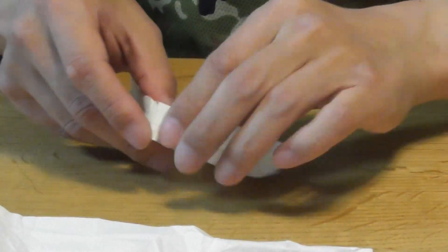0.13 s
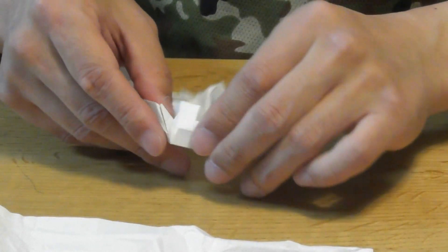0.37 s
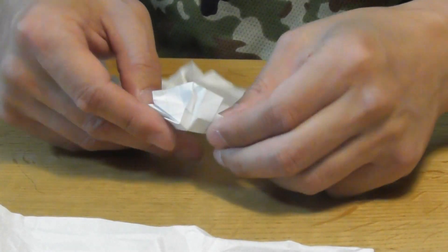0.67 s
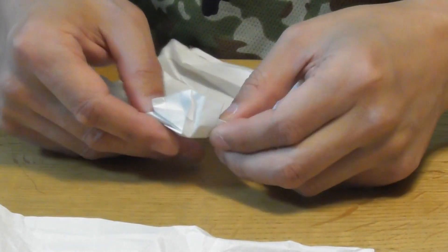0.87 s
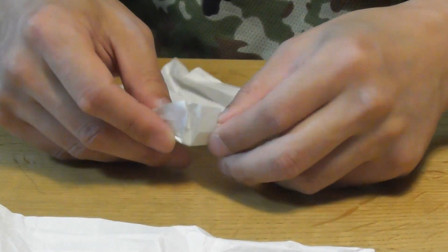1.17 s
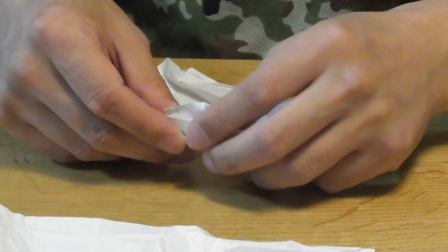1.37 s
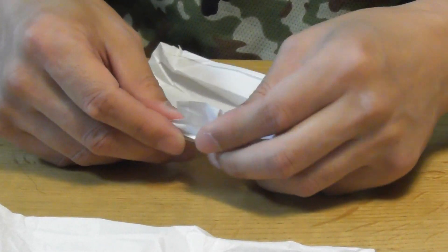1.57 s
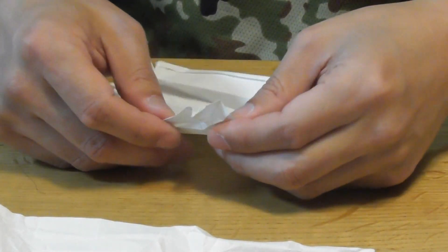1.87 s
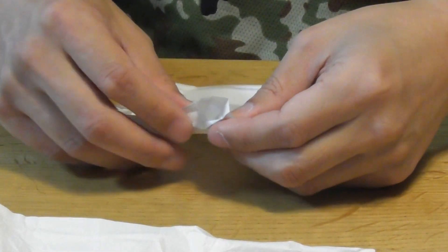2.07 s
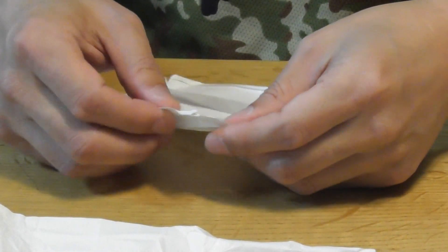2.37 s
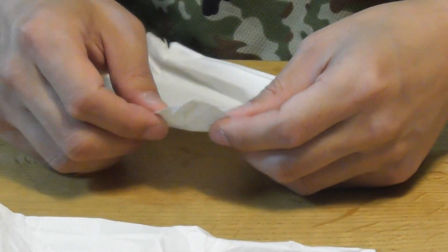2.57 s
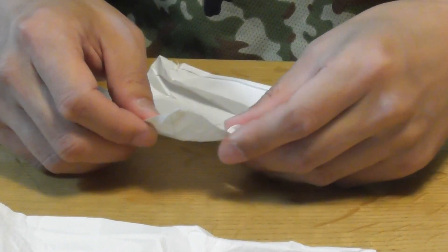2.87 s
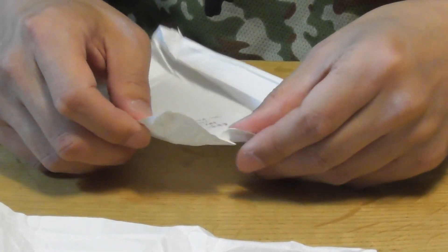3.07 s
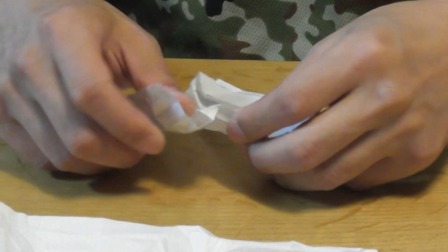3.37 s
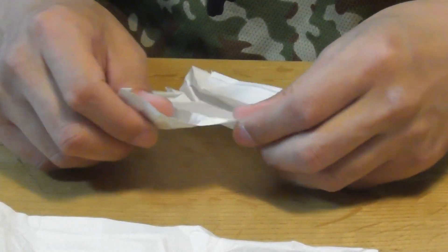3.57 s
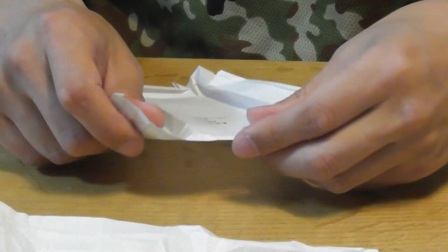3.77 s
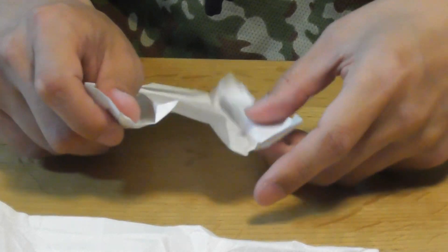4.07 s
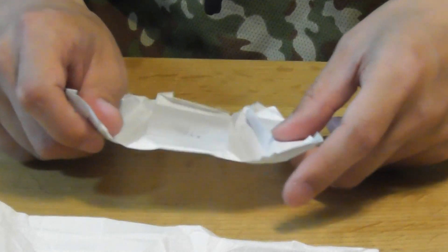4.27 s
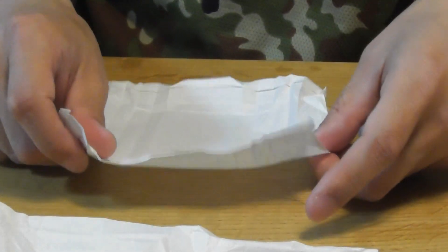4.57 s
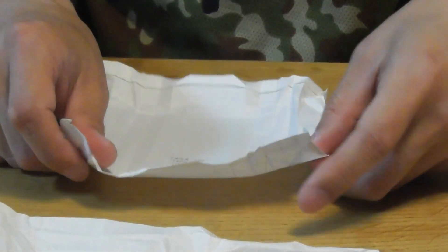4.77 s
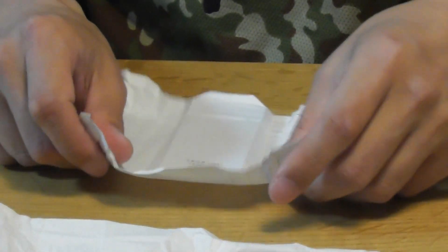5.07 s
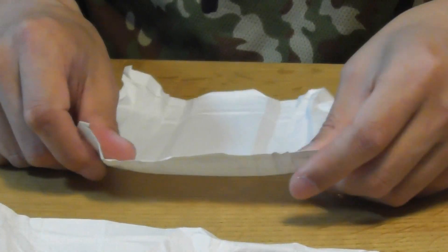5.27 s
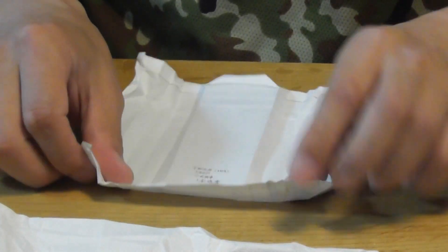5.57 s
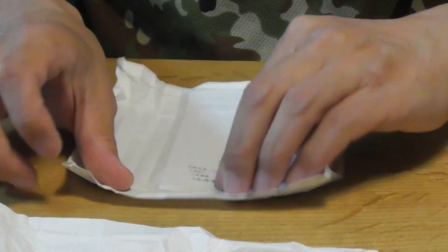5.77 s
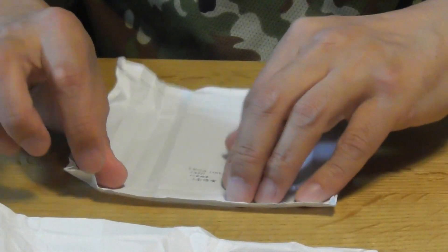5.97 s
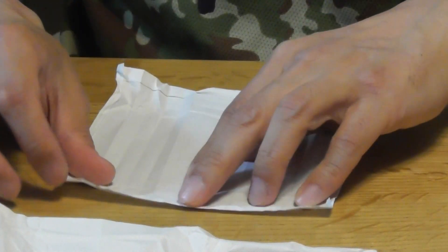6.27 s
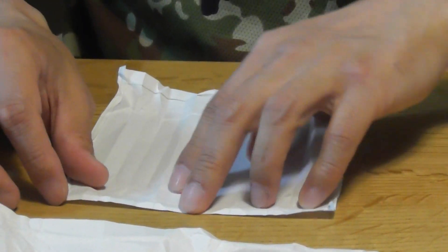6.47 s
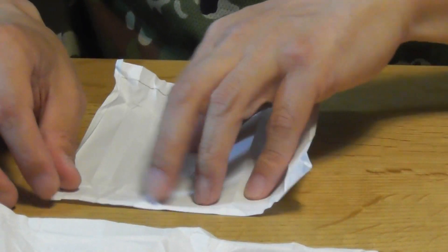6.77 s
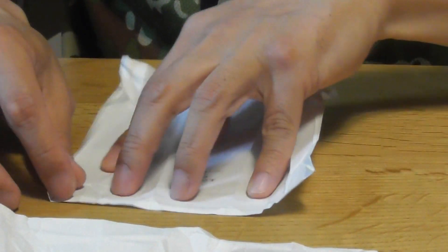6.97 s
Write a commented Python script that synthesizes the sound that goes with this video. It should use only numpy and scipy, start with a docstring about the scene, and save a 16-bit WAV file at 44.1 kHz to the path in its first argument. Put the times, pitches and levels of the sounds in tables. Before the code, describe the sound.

Hands unfold a small paper model over a wooden table, heard up close in a quiet room. From the start, creases give short, bright, irregular crinkles, mixed with dull little pops of flipping panels and the soft rustle of fingers. A sharp snap stands out at 1.5 seconds, and scattered crackles follow from about 2.2 to 3.6 seconds. The loudest, busiest cracks come between 4.1 and 4.9 seconds as the sheet opens. Another cluster runs from about 5.1 to 5.9 seconds, then fingers slide and flatten the paper, with one more crisp snap near 6.7 seconds and lighter crinkles until about 7 seconds. Wrists occasionally bump the table softly, most clearly around 2.7, 3.4 and 3.9 seconds. Underneath are faint steady hiss, a slight low rumble and very faint rapid mechanical ticking. The sound is slightly hollow, with a short echo.

```python
"""Hands unfold a small folded paper model over a wooden table in a quiet room.
Creases snap in quick runs of clicks, panels flip with a dull pop, and the sheet rustles as fingers
slide on it. Wrists bump the table. Behind this are a short echo, steady background noise, a low rumble
and a faintly ticking camera. A hollow microphone colour favours pitches near 500 Hz and 8 kHz."""
import sys
import numpy as np
from scipy import signal
from scipy.fft import rfft, irfft
from scipy.io import wavfile
from scipy.ndimage import uniform_filter1d

SR = 44100
rng = np.random.default_rng(int(sys.argv[2]) if len(sys.argv) > 2 else 0)


def materialize(psi):
    """Save the field psi as 16-bit PCM at rate SR to the path in sys.argv[1].

    A 1-D psi becomes a single channel; in a 2-D psi each row is a channel.
    """
    bounded = np.clip(np.atleast_2d(psi).T, -1, 1)
    quanta = np.round(bounded * 32767).astype(np.int16)
    wavfile.write(sys.argv[1], SR, quanta)


N = 314874


def amp(db):
    """Turn decibels into a gain."""
    return 10 ** (np.asarray(db) / 20)


def unit_level(x):
    """Scale a sound to an average power of 1."""
    return x / np.sqrt(np.mean(x ** 2) + 1e-20)


def curve_at(points, hz):
    """Read between the rows of a table of pitches and values."""
    pitches, values = np.transpose(points)
    return np.interp(np.log(hz + 1), np.log(pitches + 1), values)


def add(mix, start_s, sound):
    """Mix a sound in at its start time."""
    part = mix[max(round(start_s * SR), 0):][:len(sound)]
    part += sound[:len(part)]


def noise(shape_db, count):
    """Make rows of steady noise with the given level at each pitch."""
    return irfft(rfft(rng.standard_normal((count, N))) * amp(shape_db), N)


# The tone of paper as the microphone hears it. Each row: pitch in Hz, level in dB.
PAPER_TONE = [(120, -37.5), (200, -6), (316, -6.5), (465, -2), (1000, -8.5), (1470, -22), (2470, -29),
              (3490, -22), (4950, -29.5), (5840, -18), (8580, -4), (11000, -12.5), (15100, -25),
              (16000, -32)]

def band_ring(low_hz, high_hz, peak_hz=1000, lift_db=0., spread=.1):
    """The short ring a click leaves in one band of the paper's tone, lifted around peak_hz."""
    hz = np.fft.rfftfreq(2048, 1 / SR) + 1
    edges_db = -10 * np.log10((1 + (low_hz / hz) ** 12) * (1 + (hz / high_hz) ** 12))
    peak_db = lift_db * np.exp(-(np.log(hz / peak_hz) / spread) ** 2)
    gains = amp(np.maximum(curve_at(PAPER_TONE, hz) + edges_db + peak_db, -100))
    cepstrum = irfft(np.log(gains))
    cepstrum[1:1024] *= 2  # folding onto the first half makes the ring start at once
    cepstrum[1025:] = 0
    return irfft(np.exp(rfft(cepstrum)))


# The tone of the background noise. Each row: pitch in Hz, relative level in dB.
NOISE_TONE = [(20, -4), (127, 2), (177, 1), (513, -0.5), (1200, -16.5), (1760, -23), (2460, -37),
              (3340, -24), (5080, -32.5), (7950, -13), (10800, -30.5), (14700, -22.5), (16000, -33.5)]
# Stereo width of the background noise: almost mono from 2 to 8 kHz, with wide microphone hiss above.
# Each row: pitch in Hz, side level over mid level in dB.
NOISE_STEREO = [(30, -2.5), (200, -3.5), (1300, -7), (1900, -10.5), (2600, -63), (7800, -31), (9000, -4),
                (10500, 2.5), (15000, -2.5)]
# A wavering low hum. Each row: pitch in Hz, width in Hz, level in dB.
HUM_BANDS = [(132.97, 1.7, -67)]

def background_noise(level_db=-58):
    """Room air, microphone hiss and hum, as mid (what both ears share) and side (how they differ)."""
    hz = np.fft.rfftfreq(N, 1 / SR)
    mid_db = curve_at(NOISE_TONE, hz)
    mid_side = noise(np.array([mid_db, mid_db + curve_at(NOISE_STEREO, hz)]), count=2)
    mid_side *= amp(level_db) / mid_side[0].std()
    for hum_hz, width_hz, db in HUM_BANDS:
        hum_shape_db = -20 * np.log10(1 + (2 * (hz - hum_hz) / width_hz) ** 2)
        mid_side[0] += amp(db) * unit_level(noise(hum_shape_db, count=1)[0])
    return mid_side


# How the rumble swells and sinks. Each row: time in seconds, level in dB.
RUMBLE_LEVELS = [(0, -82), (2.3, -91), (2.8, -71), (3.3, -64), (3.9, -77), (4.6, -87), (5.3, -72),
                 (5.7, -82), (7.14, -63)]

def rumble(cutoff_hz=90):
    """Deep noise as mid and side, with the side 5 dB weaker."""
    hz = np.fft.rfftfreq(N, 1 / SR)
    deep = noise(-20 * np.log10(1 + (hz / cutoff_hz) ** 3), count=2)
    level_db = np.interp(np.arange(N) / SR, *np.transpose(RUMBLE_LEVELS))
    return amp(level_db) * unit_level(deep) * amp([[0], [-5]])


# How long the room rings. Each row: pitch in Hz, seconds to fade by 60 dB.
ECHO_TIMES = [(300, 0.31), (1000, 0.13), (3000, 0.34), (8000, 0.12), (14000, 0.016)]
# Stereo width given to the echo, narrowed almost to mono from 2 to 8 kHz.
# Each row: pitch in Hz, side level over mid level in dB.
ECHO_STEREO = [(200, -18.5), (1300, 0), (2200, -21.5), (7000, -45), (9000, -6.5), (11000, 9.5), (15000, 4)]

def room_echo(sound):
    """Sparse reflections, as mid and side, in which each pitch dies at its own speed."""
    reflections = np.zeros((3, 2, SR // 2))
    delays = np.arange(80, SR // 2 - 20, 20) + rng.integers(0, 20, (3, 2, (SR // 2 - 81) // 20))
    np.put_along_axis(reflections, delays, rng.choice([-1., 1.], delays.shape), 2)
    hz, t, spectra = signal.stft(reflections, SR, nperseg=256)
    fade_s = np.maximum(curve_at(ECHO_TIMES, hz), .03)
    spectra *= amp(-60 * t / fade_s[:, None])
    spectra[:, 1] *= amp(curve_at(ECHO_STEREO, hz))[:, None]
    tails = signal.istft(spectra, SR, nperseg=256)[1]
    # Three echoes take turns, so the tail stays smooth and no single pitch rings out.
    turns = np.sqrt(2 / 3) * np.cos(np.pi * (np.arange(N) / SR * 3 + np.arange(3)[:, None] / 3))
    return sum(signal.fftconvolve((sound * turn)[None], tail / np.linalg.norm(tail[0]), axes=1)[:, :N]
               for turn, tail in zip(turns, tails))


def camera_ticks(steps_per_s=59.94, level_db=-65.5, buzz_ms=3.5):
    """A drive in the camera steps evenly; each step is a short swelling buzz that rings the body."""
    step = np.arange(int(N / SR * steps_per_s))
    start_s = .0005 + step / steps_per_s
    step_db = level_db - 3 * (1 - step % 2)  # every other step is weaker
    step_db += 2.5 * rng.standard_normal(len(step))
    easing_off = ((start_s > .92) & (start_s < 1.36)) | ((start_s > 1.9) & (start_s < 2.15))
    kicks = np.zeros(N)
    kicks[np.round(start_s * SR).astype(int)] = amp(step_db - 10 * easing_off)
    swell = np.linspace(.5, 1, round(buzz_ms * SR / 1000))
    buzz = np.convolve(kicks, swell)[:N] * rng.standard_normal(N)
    body = band_ring(MIDDLE_HZ, HIGH_HZ, peak_hz=3046, lift_db=10.8, spread=0.061)
    treble = band_ring(HIGH_HZ, TOP_HZ, peak_hz=7460, lift_db=18.0, spread=0.061)
    ring = body / np.linalg.norm(body) + amp(3) * treble / np.linalg.norm(treble)
    return signal.oaconvolve(buzz, ring)[:N]


# Wrists and knuckles on the table. Each row: start in seconds, level in dB, pitch in Hz.
TABLE_BUMPS = [(1.854, -47, 120), (2.469, -53, 167), (2.73, -42, 96), (3.164, -63, 142),
               (3.353, -39.5, 129), (3.875, -44.5, 99), (5.172, -56, 129), (5.842, -49.5, 185)]

def table_bumps(rise_s=0.0059):
    """Soft low thuds travel through the table top, each a few cycles long."""
    out, t = np.zeros(N), np.arange(6000) / SR
    envelope = t / rise_s * np.exp(1 - t / rise_s)
    for start_s, db, hz in TABLE_BUMPS:
        add(out, start_s, amp(db) * envelope * np.sin(2 * np.pi * hz * t))
    return out


def swells(t, peak_s, db, rise_s, fade_s):
    """The summed power of swells that rise and fade by 20 dB in the given times, 3 ms at least."""
    since_s = t[:, None] - peak_s
    slope_s = np.maximum(np.where(since_s < 0, rise_s, fade_s), .003)
    return (amp(db - 20 * abs(since_s) / slope_s) ** 2).sum(axis=1)


def settling(t, events, after_db, growth, fade_s):
    """The power of paper settling: after_db follows an event of -30 dB, more follows a stronger one."""
    start_s, event_db = np.transpose(events)[:2]
    strength_db = np.minimum(event_db, -23) + 30  # the very strongest settle no louder
    return swells(t, start_s, after_db + growth * strength_db, .01, fade_s)


# Fingers sliding or pulling on the paper. Each row: time of the peak in seconds, hiss level in dB,
# flutter level in dB, rise in seconds, fade in seconds.
FINGER_STROKES = [(0.0, -56, -58.5, .1, 0.8), (0.335, -51.5, -79, 0.037, 0.1),
                  (0.429, -46, -58.5, .2, 0.07), (0.921, -49, -58.5, 0.035, 0.06),
                  (1.042, -50, -51, 0.026, -1.12), (1.147, -57, -75, 0.19, 0.1),
                  (1.233, -59.5, -85, 0.039, 1), (1.32, -57.5, -56, 0.075, -0.16),
                  (1.52, -60, -62.5, 0.057, 1.5), (1.7, -65.5, -64, 0.13, 0.46),
                  (1.989, -52, -76, 0.06, 0.17), (2.275, -49, -56, 0.052, -0.28),
                  (2.42, -58, -60, 0.058, .15), (2.62, -57, -72, 0.31, 0.5), (2.8, -59.5, -59.5, 0.34, 0.6),
                  (3.08, -59, -61.5, .1, 0.6), (3.348, -44, -47, 0.067, 0.33),
                  (3.399, -66, -41.5, 0.11, 0.3), (3.732, -49, -72, 0.15, 0.06),
                  (3.85, -50.5, -59, 0.13, 0.07), (3.925, -45.5, -53, 0.053, 0.09),
                  (4.107, -52, -56.5, 0.16, 0.56), (4.98, -58.5, -60, 0.51, 1), (5.166, -54, -53, 0.13, .3),
                  (5.312, -53, -56, 0.044, 0.1), (5.455, -50.5, -56, 0.061, 0),
                  (5.565, -47.5, -52, 0.079, 0.16), (5.795, -46.5, -50.5, 0.23, 0.21),
                  (5.87, -49.5, -56.5, 0.059, 0.56), (6.112, -69, -56.5, 0.28, 0.2),
                  (6.411, -58.5, -77, 0.036, 2), (6.547, -51.5, -60.5, 0.013, 0.2),
                  (6.69, -51, -61, 0.13, 0), (6.82, -56, -58, 0.27, .1), (7.094, -46.5, -60, 0.17, 1.5)]

def handling_levels(held_hiss_db=-76.5, held_flutter_db=-66.5):
    """Hiss and flutter in dB: fingers hold and stroke, snapped creases hiss on, popped panels flutter."""
    t = np.arange(0, N, 64) / SR
    peak_s, hiss_db, flutter_db, rise_s, fade_s = np.transpose(FINGER_STROKES)
    hiss = amp(held_hiss_db) ** 2 + swells(t, peak_s, hiss_db, rise_s, fade_s)
    hiss += settling(t, CREASE_SNAPS, after_db=-55.5, growth=1, fade_s=0.085)
    flutter = amp(held_flutter_db) ** 2 + swells(t, peak_s, flutter_db, rise_s, fade_s)
    flutter += settling(t, PANEL_POPS, after_db=-48.5, growth=0.94, fade_s=0.11)
    return [np.interp(np.arange(N) / SR, t, 10 * np.log10(power)) for power in (hiss, flutter)]


MIDDLE_HZ, HIGH_HZ, TOP_HZ = 1470, 5000, 10500  # where the three upper bands begin

def rustle(clicks_per_s=1500):
    """Skin sliding on paper makes a hiss with clumps of tiny clicks; the sheet answers in four bands."""
    hiss_db, flutter_db = handling_levels()
    clumps = unit_level(uniform_filter1d(rng.standard_normal(N), 300))
    grip = unit_level(uniform_filter1d(rng.standard_normal(N), 1000))  # the skin grips and slips
    sizes = amp(5.0 * np.minimum(rng.exponential(1, N), 4) + 5.5 * clumps + 4.1 * grip)
    clicks = sizes * rng.choice([-1., 1.], N) * (rng.random(N) < clicks_per_s / SR)
    slide = amp(1.6 * clumps + 1.6 * grip) * rng.standard_normal(N)
    band_clicks = clicks * amp(2.4 * rng.standard_normal((4, N)))  # every click favours some bands
    frictions = unit_level(slide) + amp(-8.5) * unit_level(band_clicks)
    fullness_db = flutter_db - hiss_db  # still paper sounds bright, a fluttering sheet fuller
    bands = [(hiss_db - 7.0 - 0.12 * fullness_db, band_ring(TOP_HZ, SR)),
             (hiss_db, band_ring(HIGH_HZ, TOP_HZ)),
             (hiss_db - 14.0 + 0.4 * fullness_db, band_ring(MIDDLE_HZ, HIGH_HZ)),
             (flutter_db, band_ring(170, MIDDLE_HZ, peak_hz=455, lift_db=5.0, spread=1.0))]
    return sum(amp(db) * unit_level(signal.oaconvolve(friction, ring)[:N])
               for (db, ring), friction in zip(bands, frictions))


LEAD = 300  # samples of faint crackle before the paper gives way

def click_runs(count):
    """One run of uneven clicks for each event, with a strong click where the paper gives way."""
    draws = rng.standard_normal((count, 2, 1800))
    runs = draws[:, 0] * amp(2.2 * draws[:, 1])
    runs[:, LEAD] = 5.1
    return runs


def ring_out(clicks, decay_ms, ring):
    """Clicks build faintly, break and die away, setting off a ring; the result peaks at 1."""
    t_ms = (np.arange(len(clicks)) - LEAD) / SR * 1000
    build = amp(-30.0 + 18.0 * t_ms) + amp(39.0 * t_ms)
    decay = np.exp(-abs(t_ms) / max(decay_ms, .05))
    sound = signal.fftconvolve(clicks * np.where(t_ms < 0, build, decay), ring)
    return sound / abs(sound).max()


# Panels of paper flipping over. Each row: start in seconds, level in dB, pitch in Hz.
PANEL_POPS = [(0.13, -36, 532), (0.256, -32, 408), (0.567, -46, 517), (0.772, -39.5, 640),
              (0.992, -42.5, 1260), (1.055, -43, 617), (1.316, -39.5, 480), (1.45, -39, 570),
              (1.505, -37, 577), (1.664, -43.5, 550), (1.791, -45.5, 580), (2.113, -42.5, 570),
              (2.168, -41, 534), (2.198, -43, 570), (2.269, -40.5, 533), (2.283, -28.5, 553),
              (2.453, -41, 583), (2.581, -35, 430), (2.7, -37.5, 667), (2.731, -38, 554),
              (2.995, -42.5, 620), (3.031, -42.5, 1090), (3.283, -42, 480), (3.333, -31, 396),
              (3.392, -33, 454), (3.532, -33, 560), (3.6, -29.5, 553), (3.912, -43, 515),
              (3.924, -39.5, 800), (4.012, -40, 490), (4.098, -38.5, 1100), (4.195, -39, 630),
              (4.319, -36.5, 616), (4.337, -30.5, 410), (4.581, -40.5, 440), (4.602, -31.5, 590),
              (5.119, -46, 496), (5.181, -39, 443), (5.29, -43, 427), (5.317, -40.5, 710),
              (5.552, -37, 560), (5.571, -36, 550), (5.781, -36, 426), (5.852, -57, 593),
              (5.914, -32.5, 640), (6.107, -39.5, 576), (6.645, -46, 497), (6.655, -38, 520),
              (6.908, -36, 477), (7.005, -40.5, 490), (7.031, -47, 506)]

def panel_pops(push_ms=2.1):
    """Each flip briefly pushes the air; the fold rings low, with a click near 1 kHz on top."""
    out = np.zeros(N)
    click_ring = band_ring(740, MIDDLE_HZ, peak_hz=960, lift_db=8.6, spread=0.45)
    for (start_s, db, hz), clicks in zip(PANEL_POPS, click_runs(len(PANEL_POPS))):
        fold_ring = band_ring(187, MIDDLE_HZ, hz, lift_db=11.8, spread=0.23)
        pop = ring_out(clicks, push_ms, fold_ring) + amp(-6.5) * ring_out(clicks, push_ms, click_ring)
        add(out, start_s - LEAD / SR, amp(db) * pop)
    return out


# Creases giving way. Each row: start in seconds, level of the crack in dB, level of the shaken sheet
# in dB, pitch of the sheet in Hz.
CREASE_SNAPS = [(0.13, -42, -46, 2970), (0.3337, -40, -49, 3240), (0.413, -31, -44.5, 3430),
                (0.424, -31, -44, 3180), (0.5678, -50, -47.5, 3060), (0.581, -45.5, -56, 3200),
                (0.772, -65, -57, 2730), (0.809, -42, -48, 3130), (0.996, -55, -54, 2510),
                (1.036, -40.5, -63, 3400), (1.342, -47, -62, 2900), (1.449, -31.5, -54, 2950),
                (1.498, -33, -64, 4800), (1.507, -19.5, -37.5, 3000), (1.5113, -26, -44.5, 3100),
                (1.68, -35.5, -59, 3370), (1.697, -40, -62, 3290), (2.169, -35.5, -40.5, 2960),
                (2.1986, -41, -47, 3100), (2.2695, -29.5, -47, 3370), (2.286, -40, -43, 1900),
                (2.4498, -36, -47, 3950), (2.5852, -25.5, -35, 3240), (2.826, -34, -40, 2850),
                (3.035, -31, -40, 3360), (3.366, -36, -58, 4210), (3.378, -29, -53, 3170),
                (3.461, -38, -69, 2750), (3.5339, -82, -36.5, 2530), (3.598, -27.5, -29, 4150),
                (3.911, -33, -46, 3540), (3.968, -38.5, -65, 2910), (4.0932, -32, -42.5, 3260),
                (4.0991, -19.5, -36, 2740), (4.112, -27.5, -35.5, 2780), (4.178, -30, -43, 3720),
                (4.1968, -12.5, -34, 3100), (4.3194, -33, -42, 2980), (4.3357, -21.5, -23.5, 3800),
                (4.368, -35, -42, 3400), (4.401, -44, -52, 3300), (4.5528, -28.5, -40, 3990),
                (4.601, -25, -46, 3200), (4.6073, -17.5, -33.5, 4050), (4.8802, -17, -40.5, 4270),
                (5.1276, -40, -53, 4580), (5.143, -27.5, -30.5, 3040), (5.1813, -32, -44.5, 2900),
                (5.291, -34.5, -47, 3270), (5.3178, -46, -45.5, 3080), (5.559, -31, -45, 3700),
                (5.5747, -26.5, -39.5, 4060), (5.583, -30, -49, 3530), (5.657, -23, -31.5, 3770),
                (5.7177, -38, -51, 3950), (5.7588, -29.5, -48, 3920), (5.772, -31, -39.5, 4020),
                (5.784, -32, -58, 3570), (5.839, -45, -44.5, 3000), (5.852, -50, -57, 3000),
                (5.916, -46, -50, 2600), (5.974, -36, -52, 3330), (6.011, -37, -49, 2980),
                (6.0324, -37, -46, 1780), (6.1097, -34, -49, 3100), (6.488, -35, -61, 3740),
                (6.579, -39, -47, 4180), (6.5988, -33.5, -52, 4030), (6.655, -20.5, -39.5, 4300),
                (6.78, -54, -45.5, 3320), (6.91, -29.5, -39, 3030), (6.917, -32, -39.5, 4340),
                (7.0579, -40, -40.5, 3190)]

def crease_snaps(base_crack_hz=7940):
    """Each crease tears in a quick run of clicks that make a bright crack and shake the sheet."""
    out, count = np.zeros(N), len(CREASE_SNAPS)
    pitches = base_crack_hz * np.exp(0.017 * rng.standard_normal(count))
    for snap, crack_hz, clicks in zip(CREASE_SNAPS, pitches, click_runs(count)):
        start_s, crack_db, sheet_db, sheet_hz = snap
        tear_ms = 1.91 * amp(-0.24 * (crack_db + 30))  # strong creases tear faster
        dulling = np.exp(-0.0055 * (sheet_db - crack_db + 16))  # more shaking, lower crack
        crack_ring = band_ring(HIGH_HZ, 14400, crack_hz * dulling, lift_db=8.6, spread=0.2)
        sheet_ring = band_ring(MIDDLE_HZ, HIGH_HZ, sheet_hz, lift_db=10.0, spread=0.13)
        crack = amp(crack_db) * ring_out(clicks, tear_ms, crack_ring)
        sheet = amp(sheet_db) * ring_out(clicks, tear_ms, sheet_ring)
        add(out, start_s - LEAD / SR, crack + sheet)
    return out


def scene(echo_db=-11):
    """Paper, bumps and ticks sit in the middle; only the echo, the noise and the rumble are wide."""
    handling = crease_snaps() + panel_pops() + rustle() + table_bumps()
    mid, side = amp(echo_db) * room_echo(handling) + background_noise() + rumble()
    return np.array([handling + mid + side, handling + mid - side]) + camera_ticks()


def record(dry):
    """The table's echo cancels one pitch at the microphone, and the highest treble is cut off."""
    notch_hz, width_hz, depth, cutoff_hz = 1480, 503, 0.98, 15850
    cancelled = signal.lfilter(*signal.iirpeak(notch_hz, notch_hz / width_hz, SR), dry)
    lowpass = signal.firwin(511, cutoff_hz, window=("kaiser", 9), fs=SR)
    return signal.oaconvolve(dry - depth * cancelled, lowpass[None], "same")


dry = scene()
out = record(dry)
materialize(out)
```